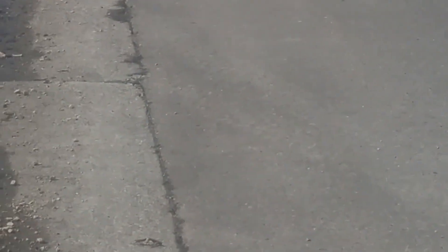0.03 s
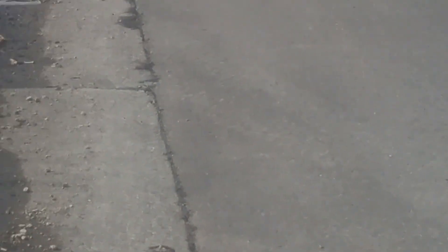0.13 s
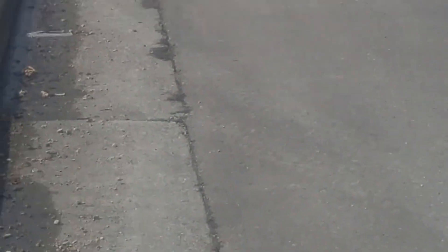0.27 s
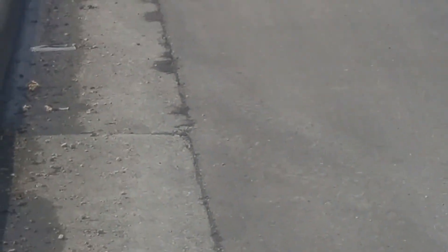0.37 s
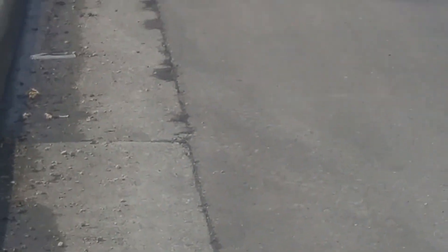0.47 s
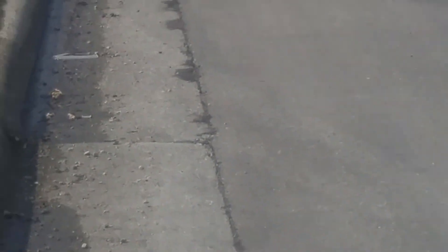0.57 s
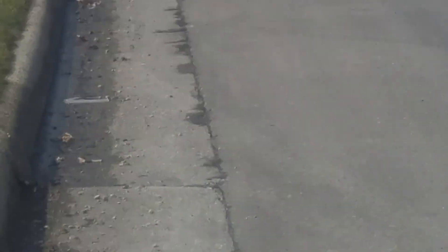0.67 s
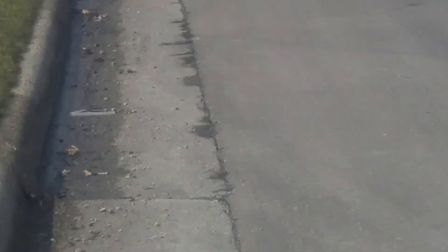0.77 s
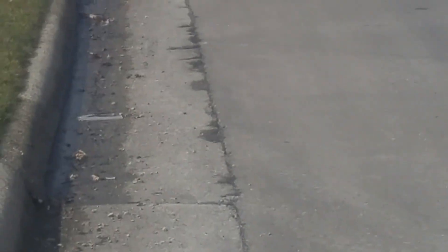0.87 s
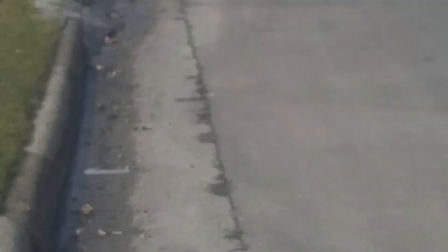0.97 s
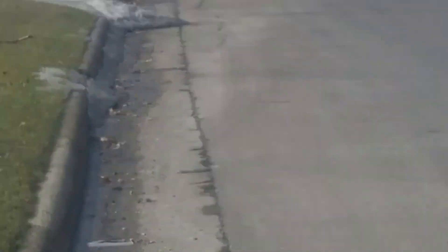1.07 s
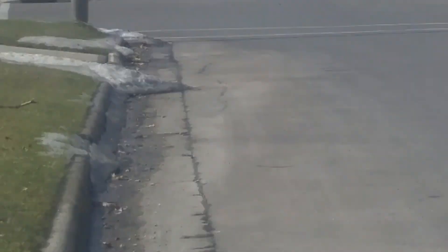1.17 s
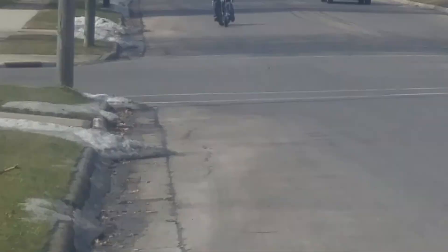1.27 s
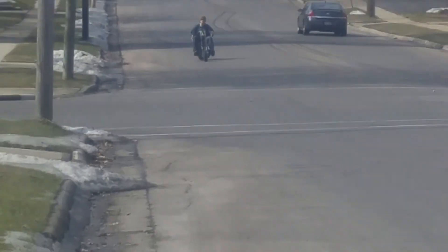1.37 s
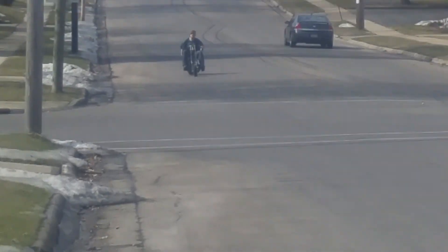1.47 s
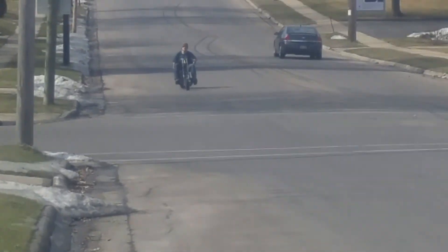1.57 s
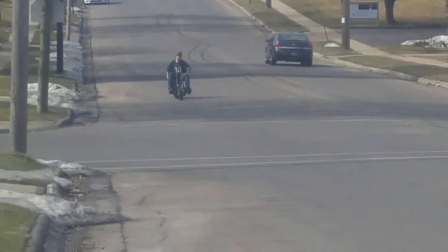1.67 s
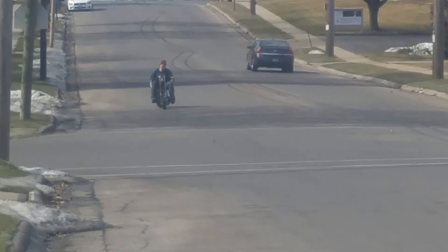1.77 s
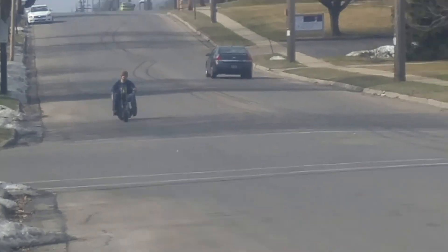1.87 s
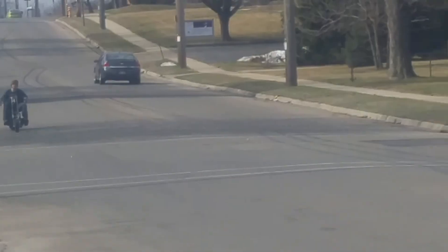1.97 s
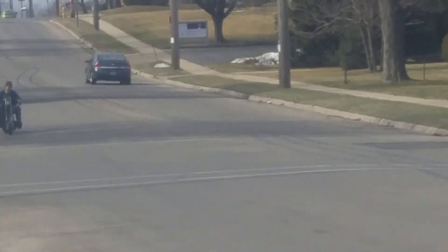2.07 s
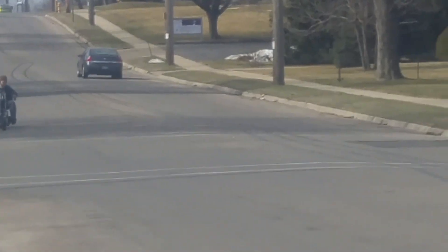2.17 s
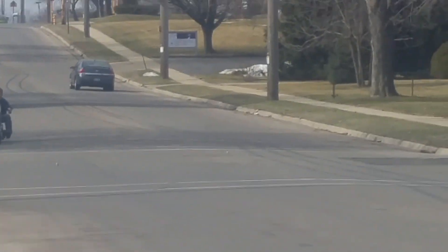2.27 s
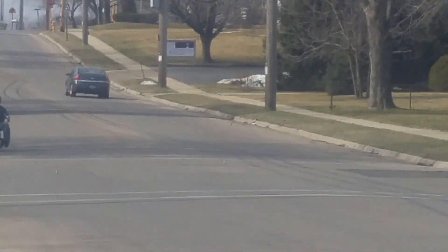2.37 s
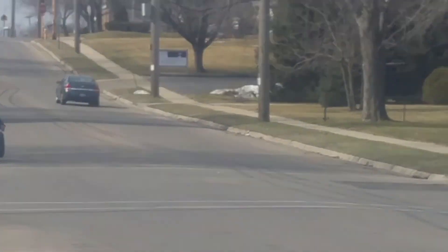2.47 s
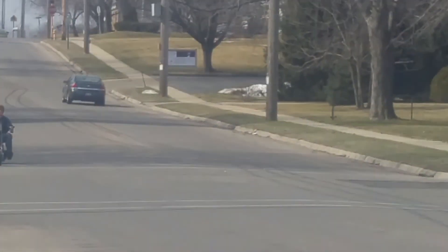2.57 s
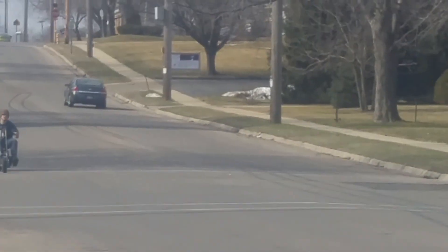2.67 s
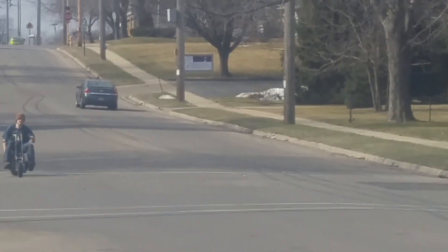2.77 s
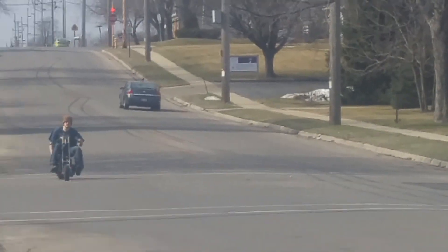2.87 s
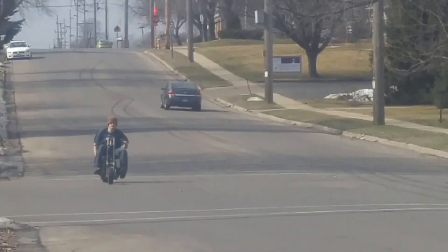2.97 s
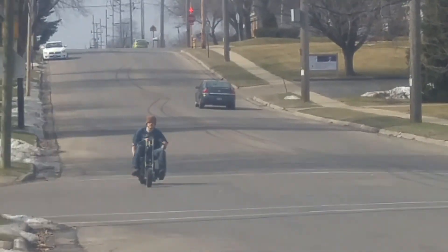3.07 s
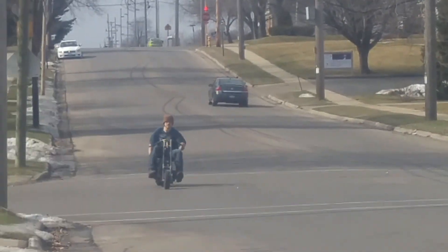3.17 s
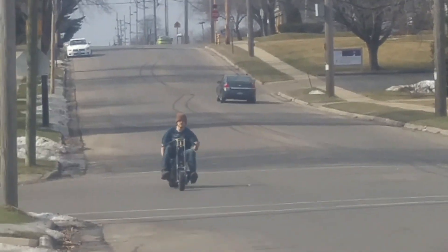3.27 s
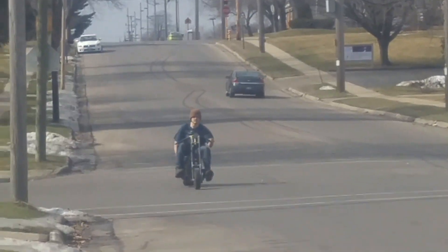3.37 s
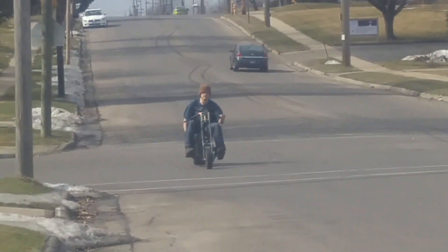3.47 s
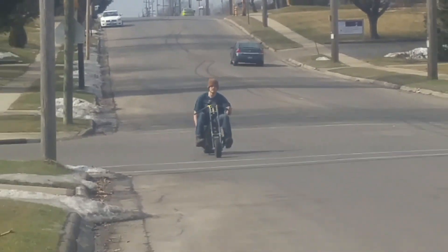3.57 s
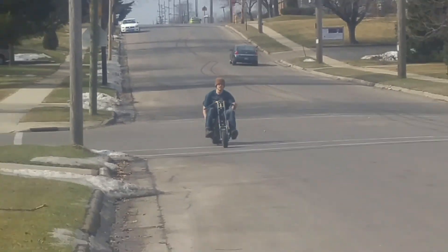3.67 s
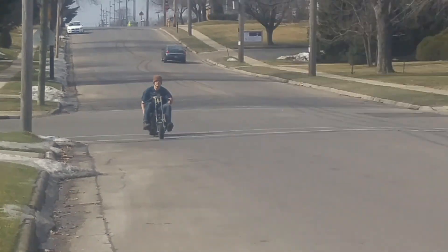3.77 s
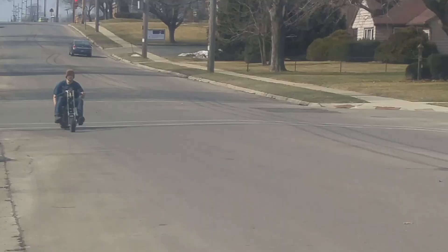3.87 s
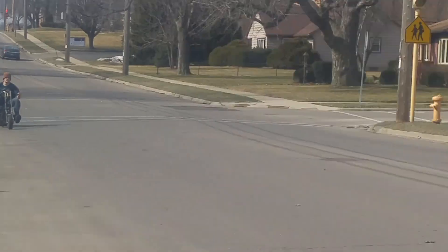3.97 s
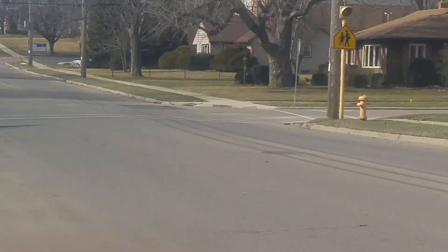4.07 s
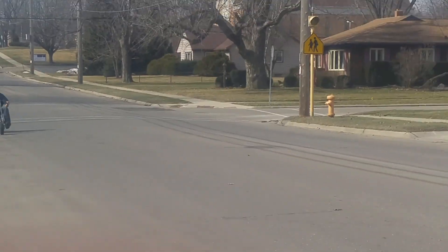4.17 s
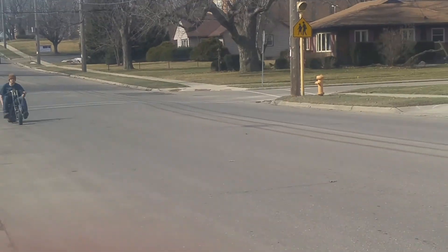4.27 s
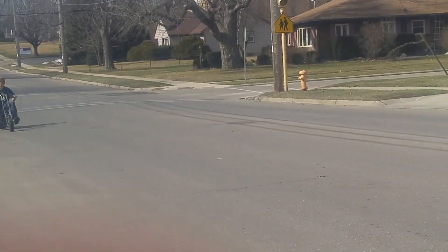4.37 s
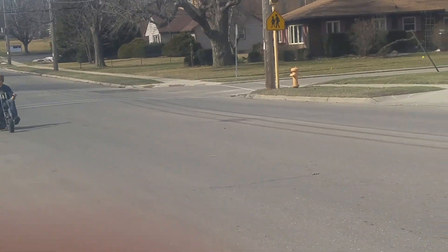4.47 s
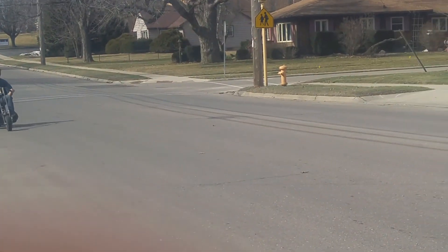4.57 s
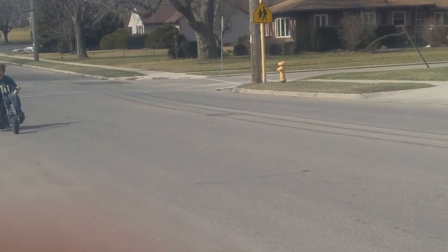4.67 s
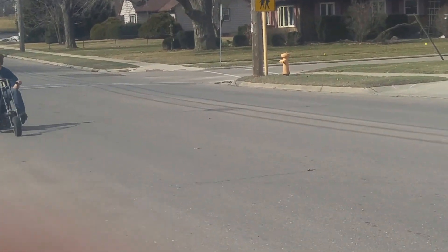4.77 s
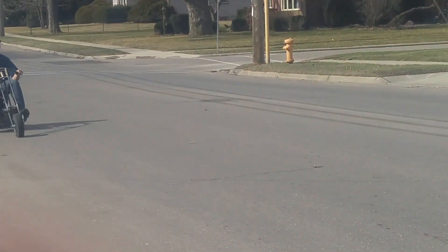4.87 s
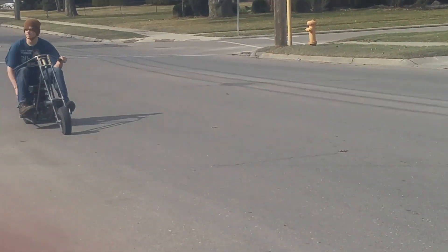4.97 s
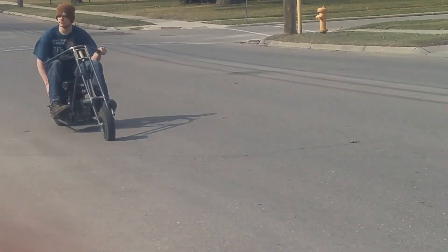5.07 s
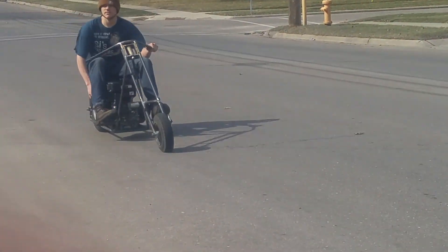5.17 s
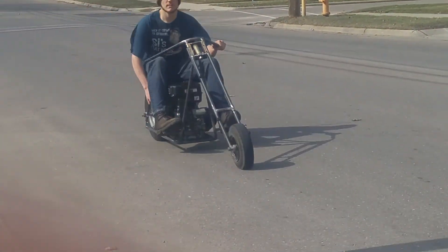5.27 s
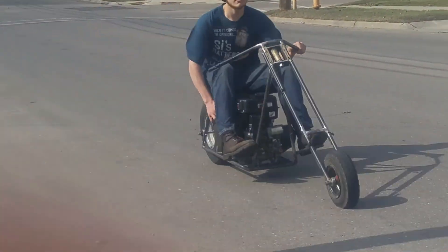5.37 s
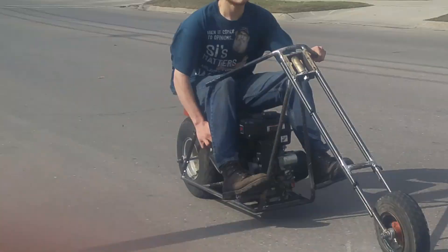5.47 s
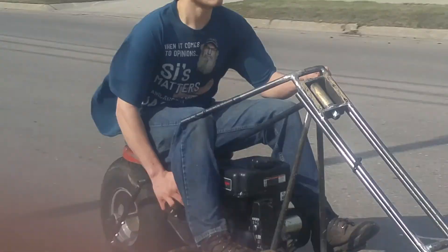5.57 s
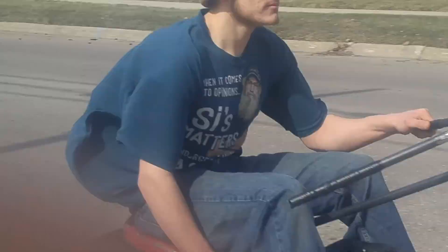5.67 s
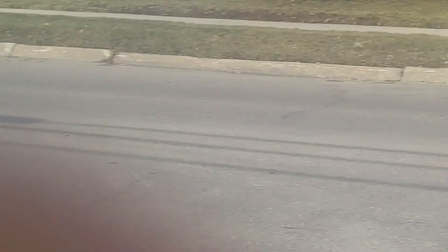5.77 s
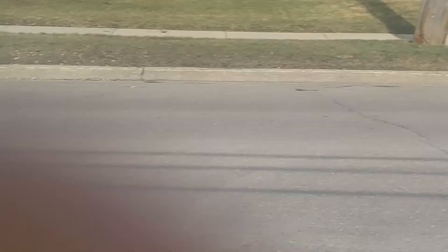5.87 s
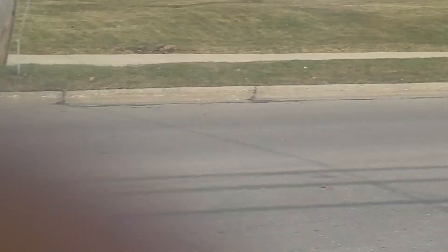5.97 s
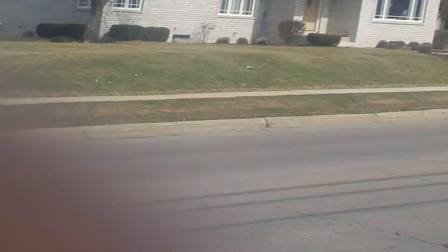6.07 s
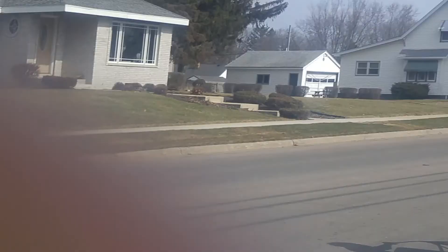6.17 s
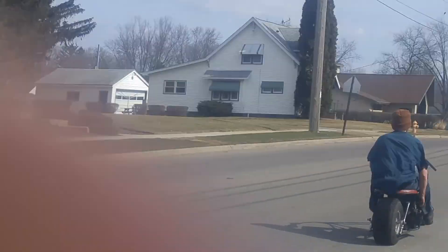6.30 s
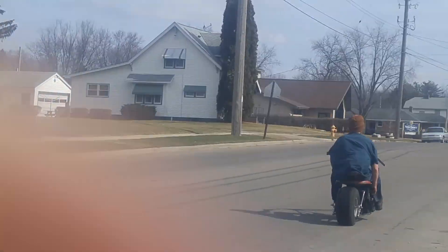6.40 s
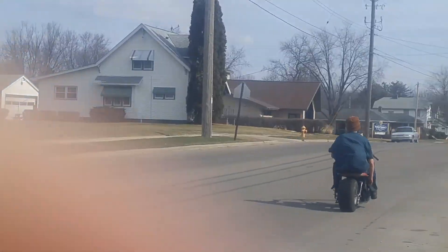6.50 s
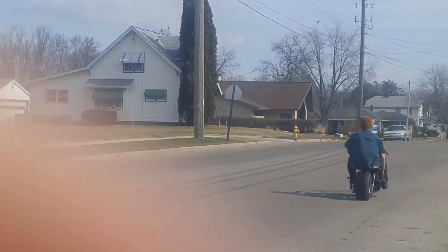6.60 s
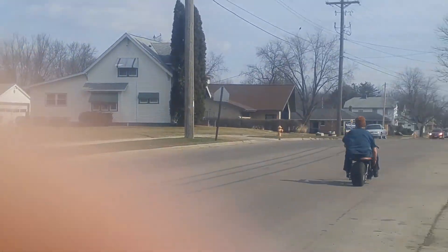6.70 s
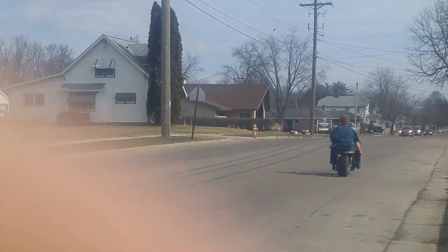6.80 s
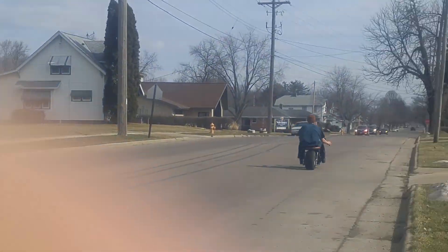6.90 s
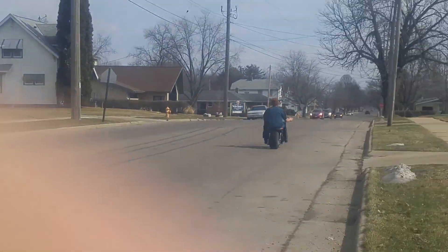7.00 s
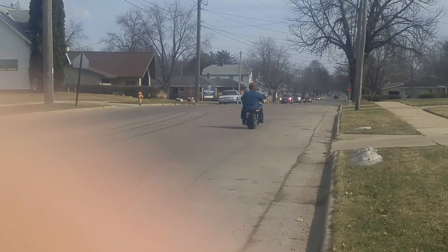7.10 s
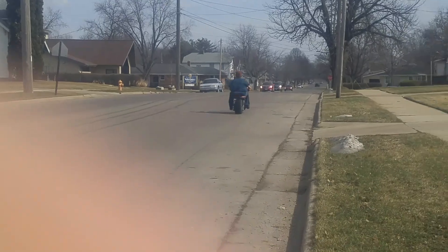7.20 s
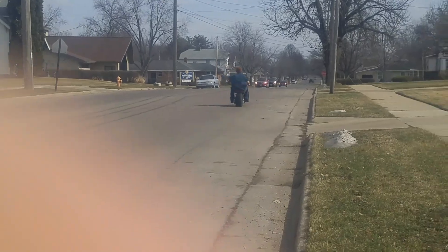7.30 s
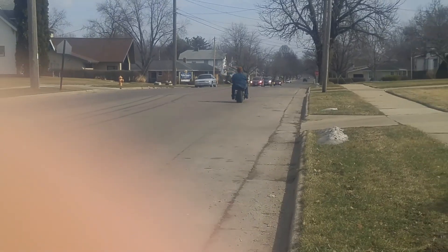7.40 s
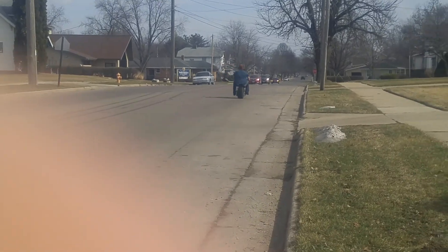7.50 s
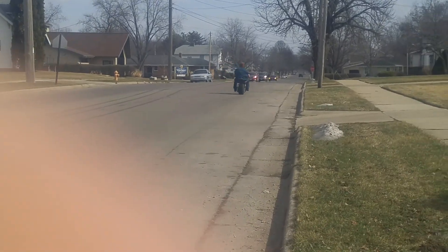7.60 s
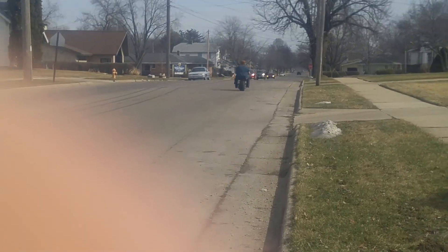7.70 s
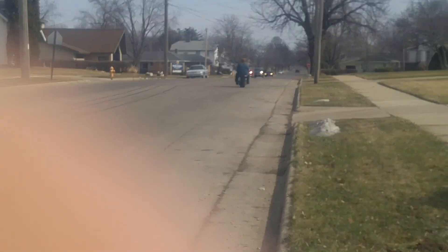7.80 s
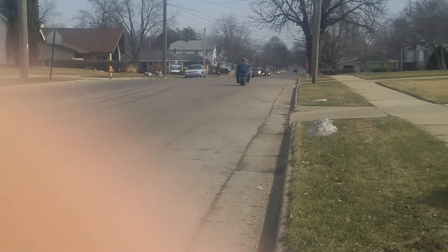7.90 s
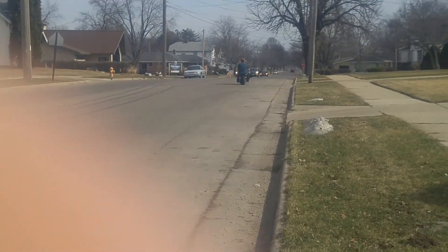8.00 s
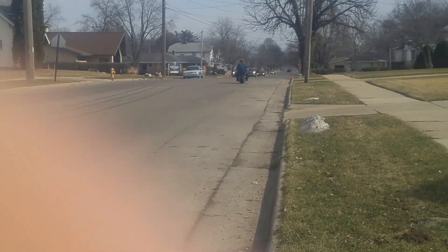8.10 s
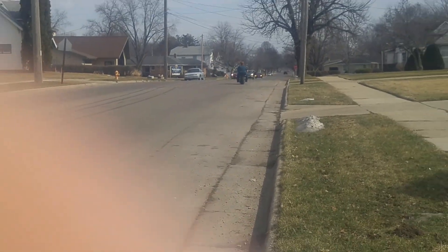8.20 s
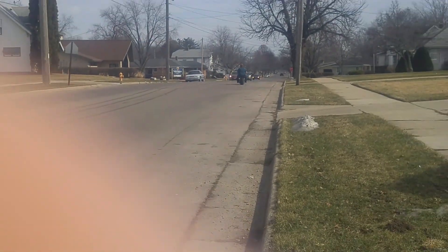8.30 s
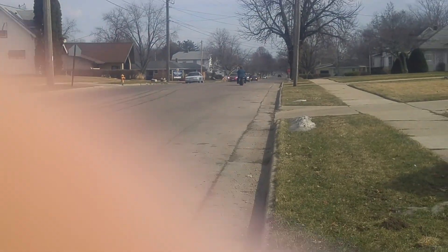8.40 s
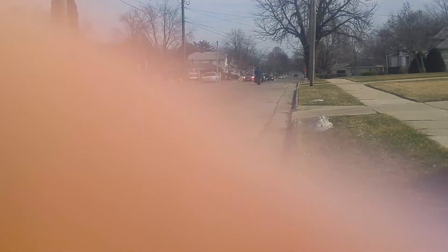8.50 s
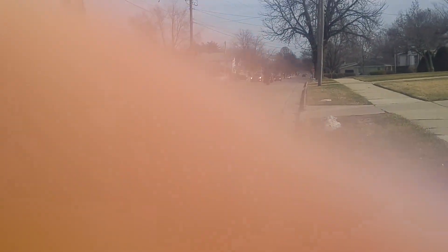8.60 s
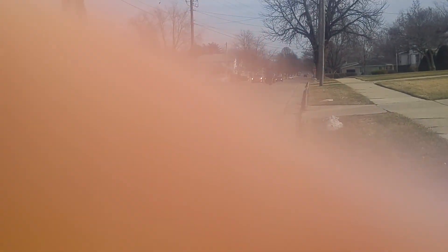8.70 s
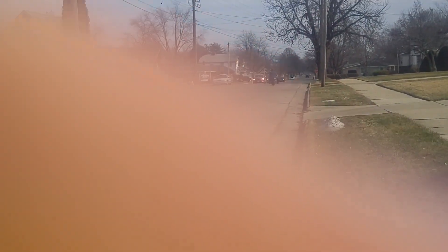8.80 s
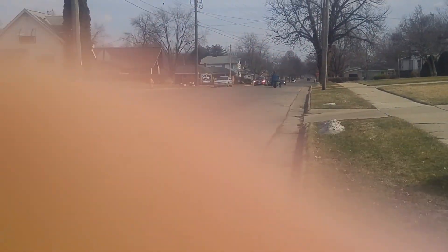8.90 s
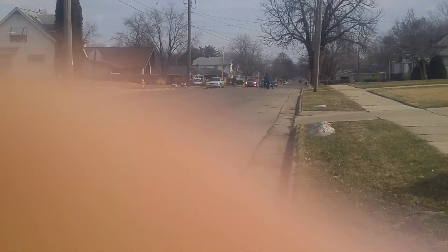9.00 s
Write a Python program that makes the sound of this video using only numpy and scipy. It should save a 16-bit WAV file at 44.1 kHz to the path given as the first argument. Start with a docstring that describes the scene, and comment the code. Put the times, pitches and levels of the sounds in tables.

```python
"""A street, the microphone out in the wind, 2.3 m from the line a mini bike takes. The one-cylinder
four-stroke rides up, passes at 5.8 s and coasts away, slowing and popping with the throttle shut.
Each firing is a thump that rings the silencer, a bark from the valve and a hissing puff of gas,
over the clatter of the running gear. Eddies rumble and tear at the microphone all the while."""
import sys
import numpy as np
from scipy import signal
from scipy.fft import rfft, irfft, next_fast_len
from scipy.io import wavfile
from scipy.ndimage import uniform_filter1d, minimum_filter1d

SR = 44100
rng = np.random.default_rng(int(sys.argv[2]) if len(sys.argv) > 2 else 0)


def master(y):
    """Save y as 16-bit WAV."""
    cut = np.clip(np.atleast_2d(y).T, -1, 1)
    pcm = np.round(cut * 32767)  # scale
    wavfile.write(sys.argv[1], SR, pcm.astype(np.int16))


N = 399105
TIME = np.arange(N) / SR
PASS_S, PASS_M, ROAD_M_PER_S = 5.844, 2.32, 9.2  # closest approach: moment, distance, road speed

# Wind at the microphone. Each row: time in seconds, level in dB, bass lift from big eddies in dB.
WIND = [(0, -13.5, 5), (.35, -17.5, 0), (.65, -21.5, -0.5), (1.0, -18.5, 2.5), (1.6, -22.5, -3),
        (2.35, -20.5, 3), (2.8, -26.5, -3), (3.5, -24, -5.5), (4.0, -18.5, -0.5), (4.6, -25, 2),
        (5.12, -21, -1), (5.32, -14.5, -1), (5.88, -13.5, -4.5), (6.55, -19, 2), (6.9, -15, -0.5),
        (7.45, -23.5, 3.5), (8.3, -23.5, 4.5), (9.05, -21, 3)]
# Brief swings of the wind. Each row: centre in seconds, length in seconds, rise or fall in dB.
GUSTS_AND_LULLS = [(0.503, 0.14, -6), (1.763, 0.075, -26), (1.905, 0.084, -25), (2.012, 0.11, -13),
                   (2.438, 0.093, 7), (2.506, 0.023, -12), (2.686, 0.067, -10), (3, .075, -19),
                   (3.085, 0.072, 6.5), (3.259, 0.039, -12), (3.318, 0.023, 8), (3.438, 0.14, -6),
                   (3.583, 0.029, 8), (3.714, 0.13, -42), (6.12, 0.15, -7.5), (7.006, .04, 3),
                   (7.255, .04, 7.5), (7.61, .08, -6.5), (8.076, 0.031, -13), (8.59, 0.26, -4.5)]
# Hard eddies on the microphone. Each row: start in seconds, relative peak in dB, length in seconds.
BUFFETS = [(0.364, -12, 0.04), (0.683, -12, 0.011), (1.705, -15, 0.019), (1.772, -27, 0.0099),
           (1.872, -19.5, 0.015), (1.952, -14.5, 0.018), (2.171, -11, 0.013), (2.48, -6, 0.01),
           (2.554, -15, 0.01), (2.646, -9.5, 0.0043), (2.659, -9.5, 0.0081), (2.91, -14.5, 0.015),
           (3.063, -17.5, 0.032), (3.144, -9, 0.0089), (3.314, -16, 0.011), (3.364, -10, 0.01),
           (3.408, -13.5, 0.014), (3.517, -27, 0.012), (3.579, -12, 0.018), (3.603, -11.5, 0.016),
           (7.513, -9.5, 0.017), (7.825, -5, 0.0092), (8.324, -6, 0.0064)]
# The colour of each sound. Each row: frequency in Hz, relative level in dB.
GUST_SPECTRUM = [(20, -55), (40, -9), (65, 4), (120, -0.5), (250, -2), (390, -3), (480, -17), (750, -9),
                 (1000, -15.5), (1300, -29.5), (2200, -21.5), (4000, -33.5), (12000, -63)]
BUFFET_SPECTRUM = [(40, -20), (120, 12), (400, -0.5), (900, 11), (1500, -2.5), (2300, -4), (4000, -31),
                   (12000, -49)]
CLATTER_SPECTRUM = [(300, -6), (1500, -3), (2200, -3), (2700, -7), (3300, -7.5), (4000, 0), (5500, -0.5),
                    (7200, 4), (8500, 0), (10000, -16.5), (12500, -22), (16000, -43)]
PUFF_SPECTRUM = [(500, -27), (1500, -10), (2700, -6), (3300, -7.5), (3900, -5), (5000, -2.5), (6300, -1),
                 (7200, 5.5), (8500, -2), (10000, -13.5), (12500, -21.5), (16000, -29)]
BARK_SPECTRUM = [(100, -20.5), (400, -6), (750, 6.5), (1050, 8), (1500, -1), (2200, -5), (3000, -11.5),
                 (6000, -24.5), (15000, -40.5)]
THUMP_SPECTRUM = [(25, -15), (70, -24), (130, 2), (210, 2), (390, -3), (470, -16), (700, -32.5),
                  (850, -22.5), (1300, -25), (3000, -46.5), (8000, -87)]
# Narrow, metallic-sounding resonances. Each row: start and end in seconds, pitch in Hz, level in dB.
RINGING_BANDS = [(0, .35, 2870, -19.5), (0, 1.1, 1650, -25), (1.1, 1.8, 3360, -24), (1.305, 1.9, 5550, -23),
                 (4.501, 5.1, 3150, -31), (5.85, 6.1, 3220, -17), (6.293, 7.0, 1480, -17.5),
                 (7.15, 7.2, 3500, -14), (8.8, 9.05, 2200, -16), (8.6, 9.05, 3080, -28)]
# The drive knocks as the load comes on. Each row: time in seconds, level in dB.
DRIVE_KNOCK = [(0, -57), (3.64, -42), (3.8, -18), (3.92, -31), (4.6, -30), (9.05, -65)]
# Resonances of the drive and the silencer. Each row: frequency in Hz, width in Hz, level in dB.
DRIVE_MODES = [(3150, 390, 1.5), (5000, 560, -1.5)]
SILENCER_MODES = [(280, 110, -13), (373, 43, -7.5), (837.5, 32, -8)]
# The bike's treble from the roadside. Each row: time in seconds, then puff, clatter, brightness in dB.
TREBLE = [(0, -21.5, -24.5, -13), (.6, -23, -28, -5), (1.38, -18.5, -22.5, -4), (1.85, -21.5, -30, -10.5),
          (2.7, -36.5, -32, -3), (3.4, -25, -28.5, -3), (3.95, -24.5, -28, -3.5), (4.09, -11.5, -18, 15.5),
          (4.32, -15.5, -23.5, 5), (4.95, -12.5, -20.5, 10), (5.17, -23.5, -31, -6.5),
          (5.38, -16.5, -27, -10), (5.55, -7.5, -21, -4), (5.92, 0, -18, -4), (6.1, -12.5, -24, 0),
          (6.57, -11.5, -17, 4), (6.74, -33, -21.5, -2), (7.05, -32, -34, -2), (7.6, -36.5, -42.5, -11),
          (8.05, -35, -45, -6), (8.2, -35, -36.5, -8), (8.6, -43, -35, -10), (9.05, -24, -29.5, -17)]
# The finest hiss, strongest with the bike alongside. Each row: time in seconds, top-end lift in dB.
FIZZ = [(0, -8), (1.85, -17), (2.1, 9), (2.8, -5.5), (3.4, 0.5), (4.1, -3.5), (4.8, -5), (5.2, 14.5),
        (5.95, 11), (6.6, -1), (9.05, 5)]
# The engine holds steady, then runs down. Each row: time in seconds, firings per second.
FIRING_RATE = [(0.0, 35.411), (3.1, 35.337), (3.7, 35.125), (4.1, 35.421), (5.6, 35.578), (5.95, 33.712),
               (6.12, 29.37), (6.3, 30.959), (6.5, 30.534), (6.9, 27.24), (7.4, 24.577), (8.1, 23.686),
               (8.35, 20.726), (8.6, 22.395), (8.8, 18.873), (9.05, 21.58)]
# The exhaust at the passing distance: the throttle opens, eases twice, then shuts.
# Each row: time in seconds, thump in dB, bark in dB.
EXHAUST = [(0, -6, 0), (1.4, -5, -13), (1.8, -30, -5.5), (3.4, -26, -14), (3.72, -36, -13),
           (3.93, -2.5, -12), (4.92, -6, -12), (5.05, -13.5, -17), (5.26, -3.5, -8.5), (5.88, -8.5, -4.5),
           (6.0, -24, -31), (6.12, -28, -26), (6.24, -8, -14.5), (6.6, -4, -7), (6.8, -11.5, 0.5),
           (7.0, -26, -11), (7.9, -9, -5.5), (9.05, -11.5, -3.5)]
# Exhaust pulse, its rebound, intake pulse. Each row: place as a share of the cycle, level in dB.
STROKES = [(0, -2), (0.288, -12.5), (0.626, -10.5)]
# Weak firings. Each entry: time in seconds.
MISFIRES = [6.099, 6.165]
# Hard firings with the throttle shut. Each row: time in seconds, bark in dB, puff in dB.
POPS = [(6.8715, -13, -20), (6.911, -16, -26), (6.947, -18, -28), (6.982, -8, -22), (7.0192, -13.5, -25),
        (7.0568, -15.5, -22.5), (7.131, -20, -42), (7.1738, -17, -29), (7.212, -14, -26), (7.328, -18, -31),
        (7.3701, -17, -30), (8.072, -16.5, -34), (8.114, -17.5, -34), (8.1591, -16, -28),
        (8.2037, -15.5, -29.1417), (8.2492, -19.5, -39), (8.664, -13.5, -31), (8.7135, -16, -46),
        (8.7596, -17.5, -43), (8.866, -26, -28), (9.013, -17, -18.5)]
# Narrow dips in the microphone's response. Each row: centre in Hz, width in Hz, depth in dB.
MIC_DIPS = [(592, 170, -24), (1865, 260, -25), (2470, 150, -25), (7800, 450, -7)]


def amp(db):
    """Decibels to gain."""
    return 10 ** (np.asarray(db) / 20)


def unit(x):
    """Scales to an rms of 1."""
    return x / np.sqrt(np.mean(x ** 2) + 1e-20)


def curve(rows, s, column=1):
    """Reads one column of a table at the times s."""
    rows = np.asarray(rows)
    return np.interp(s, rows[:, 0], rows[:, column])


def spectrum(points, hz):
    """Gain of a spectrum, joined on a log-frequency axis."""
    f, db = np.transpose(points)
    return amp(np.interp(np.log(hz + 1), np.log(f), db))


def filtered_noise(gain):
    """Noise of rms 1 whose spectrum follows a function of frequency."""
    size = next_fast_len(N, True)
    hz = np.fft.rfftfreq(size, 1 / SR)
    white = rng.standard_normal(2 * len(hz)).view(complex)
    return unit(irfft(white * gain(hz), size)[:N])


def noise(points):
    """Noise of rms 1 in the colour of a spectrum table."""
    return filtered_noise(lambda f: spectrum(points, f))


def drift(hz):
    """Random wander of rms 1, up to about the given rate."""
    return filtered_noise(lambda f: np.exp(-np.minimum(f / hz, 10) ** 2))


def ringing(hz, width):
    """Noise of rms 1 in one steep-sided resonance."""
    return filtered_noise(lambda f: 1 / (1 + ((f - hz) / width * 2.3) ** 2))


def swell(at, length):
    """A smooth bump of height 1 centred on a moment."""
    return np.exp(-((TIME - at) / length * 2) ** 2)


def burst(rise_s, decay_s):
    """Envelope with a quick rise and an exponential tail, peak 1."""
    t = TIME[:SR // 20]
    shape = (1 - np.exp(-(t / rise_s) ** 2)) * np.exp(-t / decay_s)
    return shape / shape.max()


def blow(points, size=4096):
    """Minimum-phase pulse of energy 1 with the given spectrum."""
    log_gain = np.log(spectrum(points, abs(np.fft.fftfreq(size, 1 / SR))))
    wave = np.fft.ifft(np.exp(np.conj(signal.hilbert(log_gain)))).real[:size // 2]
    return wave / np.linalg.norm(wave)


def strike(s, gains, wave):
    """Plays one wave at each of the times s."""
    out = np.zeros(N + len(wave))
    starts = np.clip(np.round(s * SR).astype(int), 0, N - 1)
    for at, gain in zip(starts, gains * np.ones(len(s))):
        out[at:at + len(wave)] += gain * wave
    return out[:N]


def scatter(s, spread_db):
    """A random factor for each firing: no two are alike."""
    return amp(spread_db * rng.standard_normal(len(s)))


def shelf(x, db, split_hz):
    """Raises or lowers everything above the split by a curve of dB."""
    low = signal.sosfiltfilt(signal.butter(4, split_hz, fs=SR, output="sos"), x)
    return low + amp(db) * (x - low)


def wind(eddy_db=2.5, flutter_db=2, sway_db=0.62, tear_db=-13, tear_spread_db=4):
    """Lumpy turbulence at the microphone port, with gusts and lulls; small eddies tear through it."""
    eddies = amp(eddy_db * drift(hz=42.5) + flutter_db * drift(hz=156))
    eddies /= np.sqrt(uniform_filter1d(eddies ** 2, size=SR // 8))  # they share out the gust's strength
    bass_db = curve(WIND, TIME, column=2)
    rumble = amp(bass_db) * shelf(noise(GUST_SPECTRUM), -bass_db, split_hz=163)
    tearing = noise(BUFFET_SPECTRUM) * amp(tear_db - bass_db + tear_spread_db * drift(hz=29.7))
    gust_db = sum(db * swell(at, length) for at, length, db in GUSTS_AND_LULLS)
    level_db = curve(WIND, TIME) + gust_db + sway_db * drift(hz=8.5)
    return (rumble + tearing) * eddies * amp(level_db)


def buffets(level_db=-7):
    """Single hard eddies tear across the microphone port."""
    force = sum(amp(db) * swell(at + length / 2, length) for at, db, length in BUFFETS)
    return amp(level_db) * force * noise(BUFFET_SPECTRUM)


def ringing_bands(s, width_hz=230, lead_s=0.00067):
    """Narrow resonances ring briefly with each firing, each over its own stretch of the ride."""
    shape, out = burst(rise_s=0.0007, decay_s=0.0042), 0
    for start, end, hz, db in RINGING_BANDS:
        sounding = (s > start) & (s < end)
        out += ringing(hz, width_hz) * strike(s - lead_s, amp(db) * sounding, shape)
    return out


def clatter(s, cycle_s, level_db=-3.5, knock_share=0.367):
    """Chain, fan and valve gear rattle on; the drive knocks between the firings."""
    gear = noise(CLATTER_SPECTRUM) * amp(curve(TREBLE, TIME, column=2) + level_db + 2 * drift(hz=260))
    knock_s = s + knock_share * cycle_s
    knocks = strike(knock_s, amp(curve(DRIVE_KNOCK, knock_s)), burst(rise_s=0.0008, decay_s=0.0055))
    drive = noise(CLATTER_SPECTRUM) + sum(amp(db) * ringing(hz, width) for hz, width, db in DRIVE_MODES)
    return gear + knocks * drive


def shimmer(x, depth_db=2.0, size=1024):
    """Reflections off the road and the frame ripple the treble, and shift as the bike moves."""
    frames = signal.stft(x, SR, nperseg=size)[2]
    ripple = rng.standard_normal(frames.shape)
    for _ in range(2):
        ripple = uniform_filter1d(ripple, size=8, axis=0)  # across frequency
        ripple = uniform_filter1d(ripple, size=7, axis=1)  # across time
    gain = unit(amp(depth_db * unit(ripple)))
    return signal.istft(frames * gain, SR, nperseg=size)[1][:N]


def brighten(x, db):
    """Tips the treble about its middle at roughly equal power: the pipe beams its highs."""
    return shelf(x, db, split_hz=6120) / np.sqrt((1 + amp(db) ** 2) / 2)


def puffs(s, gains, level_db=3.5, lead_s=0.0015, colours=4):
    """A jet of gas hisses out of the pipe at each firing, in one of a few slightly different colours."""
    gains = gains * scatter(s, spread_db=-1.03)
    kind = rng.integers(0, colours, len(s))
    shape, out = burst(rise_s=0.0062, decay_s=0.0025), 0
    for k in range(colours):
        colour = np.array(PUFF_SPECTRUM, float)
        colour[:, 1] += 2 * rng.standard_normal(len(colour))  # dB
        out += noise(colour) * strike(s - lead_s, gains * (kind == k), shape)
    return amp(level_db) * out * amp(2.4 * drift(hz=600))


def silencer_ring(s, gains, level_db=-12, width_hz=30):
    """The gas stream keeps the silencer's top mode sounding, a hollow note."""
    stream = strike(s, gains, burst(rise_s=0.0061, decay_s=0.013))
    return amp(level_db) * ringing(SILENCER_MODES[-1][0], width_hz) * stream


def putts(hz=1120, decay_s=0.0033, level_db=3, delay_s=0.00037):
    """A hard pop makes the tailpipe ring for a few cycles, a hollow putt."""
    t, out = TIME[:SR // 40], 0
    for at, bark_db, _ in POPS:
        pitch_hz = hz * amp(1.1 * rng.standard_normal())  # strays by about 13 %
        wave = np.sin(2 * np.pi * pitch_hz * t) * np.exp(-t / decay_s)
        out += strike(np.array([at + delay_s]), amp(bark_db + level_db), wave)
    return out


def barks(s, gains, crack_db=19, rasp_db=-2, delay_s=0.0002, pipe_s=0.000974, return_db=2):
    """The valve opens with a crack that comes back inverted from the pipe's end; a rasp follows."""
    gains = gains * scatter(s, spread_db=-0.5)
    trip_s = pipe_s * scatter(s, spread_db=2.0)  # gas heat changes the travel time, and so the colour
    wave = blow(BARK_SPECTRUM)
    crack = strike(s + delay_s, gains, wave)
    echo = amp(return_db) * strike(s + delay_s + trip_s, gains, wave)
    rasp = noise(BARK_SPECTRUM) * strike(s, gains, burst(rise_s=0.00089, decay_s=0.0094))
    return amp(crack_db) * (crack - echo) + amp(rasp_db) * rasp


def thumps(s, cycle_s, gains, level_db=-1, delay_s=0.00081, jitter_s=0.0001):
    """Exhaust and intake pulses, which set the silencer ringing."""
    pulse = blow(THUMP_SPECTRUM)
    t, rings, out = TIME[:len(pulse)], 0, 0
    for hz, width, db in SILENCER_MODES:
        envelope = 2 * np.pi * width / SR * np.exp(-np.pi * width * t)
        rings += amp(db) * envelope * np.cos(2 * np.pi * hz * t)
    wave = pulse + signal.fftconvolve(pulse, rings)[:len(pulse)]
    strength = gains * np.sqrt(cycle_s * SR)  # the same power at any engine speed
    at = s + delay_s + jitter_s * rng.standard_normal(len(s))
    for share, db in STROKES:
        out -= strike(at + share * cycle_s, strength * amp(db) * scatter(s, spread_db=2.3), wave)
    return amp(level_db) * out


def nearness(s):
    """Level in dB at the microphone, falling with the bike's distance; 0 at the closest point."""
    distance_m = np.hypot(PASS_M, ROAD_M_PER_S * (s - PASS_S))
    return -20 * np.log10(distance_m / PASS_M)


def firings(misfire_db=-13, pop_thump_db=-5.5):
    """The cylinder fires once a cycle: times s, cycle lengths and gains of thump, bark and puff."""
    cycles = np.cumsum(curve(FIRING_RATE, TIME)) / SR
    s = np.interp(np.arange(int(cycles[-1]) + 1), cycles, TIME)
    levels_db = np.array([curve(EXHAUST, s) + nearness(s),
                          curve(EXHAUST, s, column=2) + nearness(s),
                          curve(TREBLE, s)])
    for at in MISFIRES:
        levels_db[:, np.argmin(abs(s - at))] += misfire_db
    for at, bark_db, puff_db in POPS:
        k = np.argmin(abs(s - at))  # a pop takes the place of the nearest firing
        s[k] = at
        levels_db[:, k] = bark_db + pop_thump_db, bark_db, puff_db
    return s, 1 / curve(FIRING_RATE, s), *amp(levels_db)


def scene(clatter_beam=0.72):
    """Bike and wind from the roadside, in mono; the clatter is less beamed than the pipe's hiss."""
    s, cycle_s, thump, bark, puff = firings()
    bright_db = curve(TREBLE, TIME, column=3)
    hiss = brighten(puffs(s, puff), bright_db)
    gear = brighten(clatter(s, cycle_s), clatter_beam * bright_db)
    treble = shimmer(shelf(hiss + gear, curve(FIZZ, TIME), split_hz=9350))
    exhaust = thumps(s, cycle_s, thump) + silencer_ring(s, thump) + barks(s, bark) + putts()
    return (exhaust + treble + ringing_bands(s) + wind() + buffets())[None]


def record(dry, low_hz=30, top_hz=15900):
    """The microphone's bass cut and dips, a fast limiter at full scale, then a band limit."""
    hz = np.fft.rfftfreq(N, 1 / SR)
    response = hz ** 2 / np.sqrt(hz ** 4 + low_hz ** 4)
    for centre, width, depth_db in MIC_DIPS:
        detune = 1j * (hz ** 2 - centre ** 2) / (hz * width + 1e-9)
        response = response * (amp(depth_db) + detune) / (1 + detune)
    mic = irfft(rfft(dry) * response, N)
    gain = minimum_filter1d(1 / np.maximum(abs(mic), 1), size=65)
    limited = mic * uniform_filter1d(gain, size=65)
    lowpass = signal.firwin(511, top_hz, window=("kaiser", 9), fs=SR)
    return signal.oaconvolve(limited, lowpass[None], "same")


dry = scene()
out = record(dry)
master(out)
```